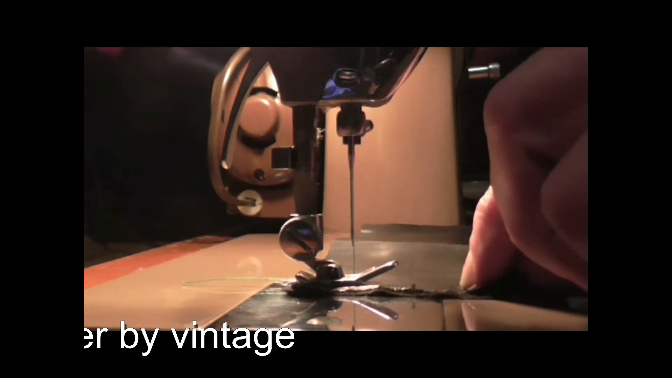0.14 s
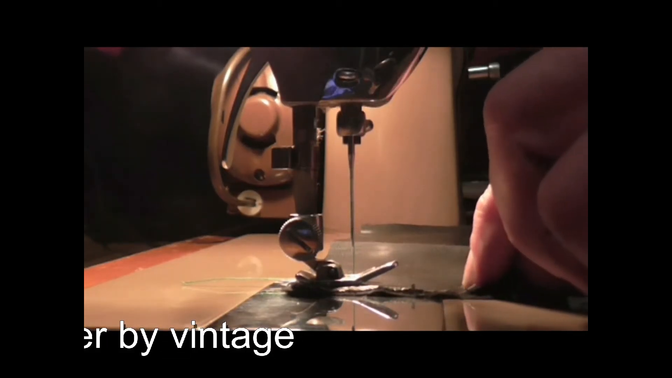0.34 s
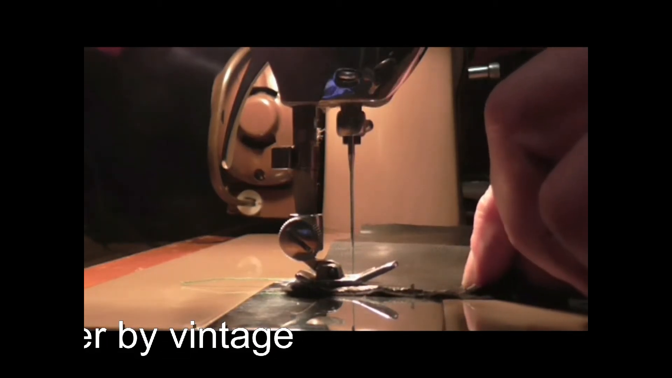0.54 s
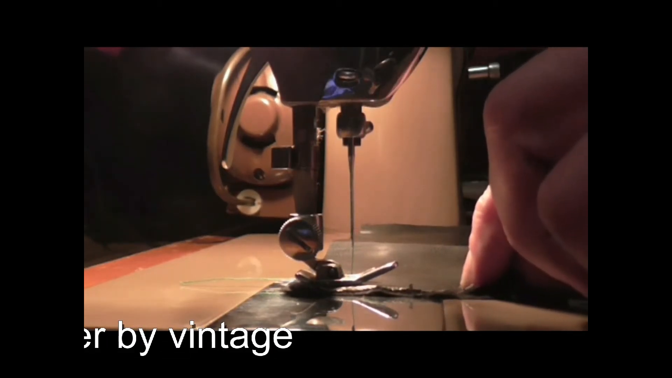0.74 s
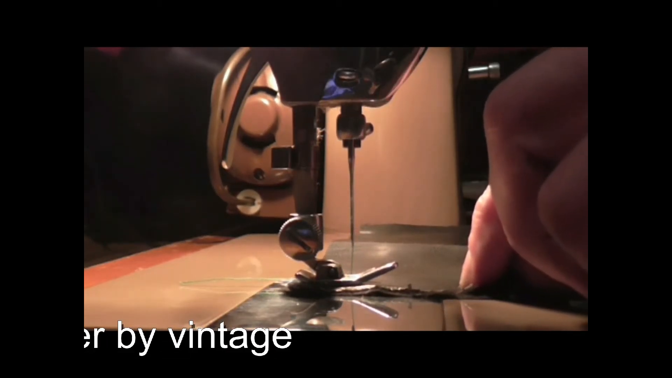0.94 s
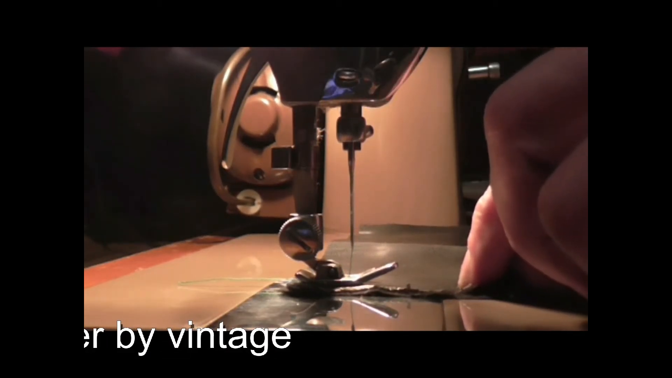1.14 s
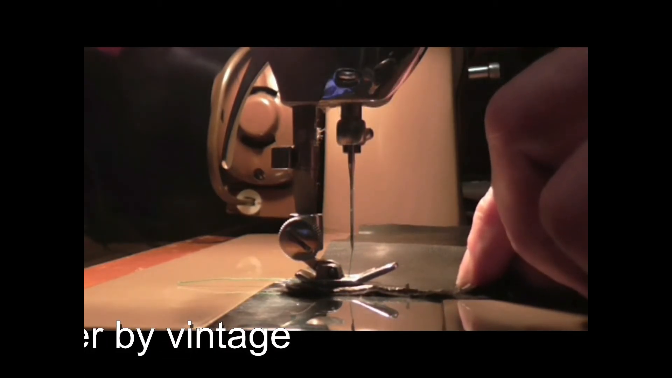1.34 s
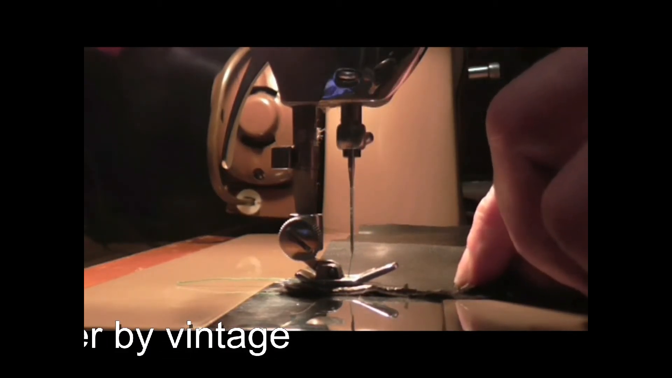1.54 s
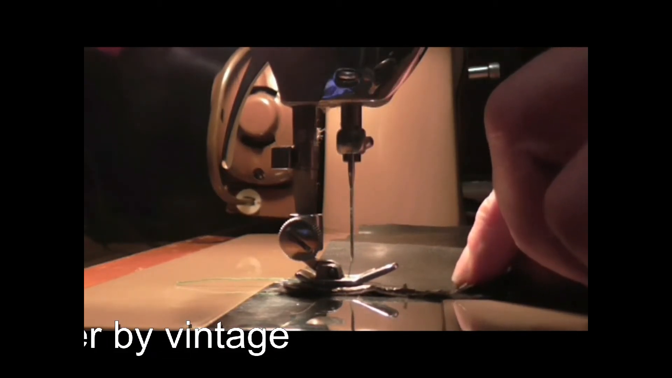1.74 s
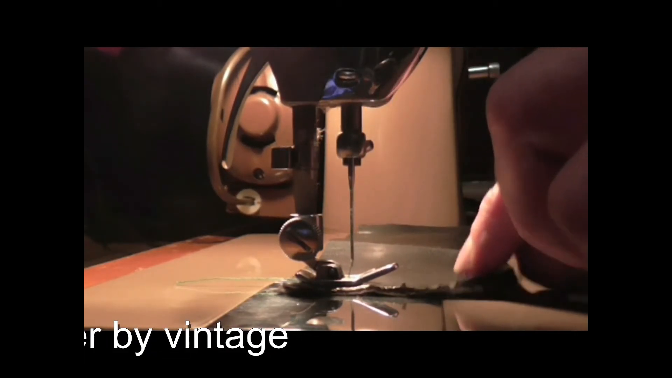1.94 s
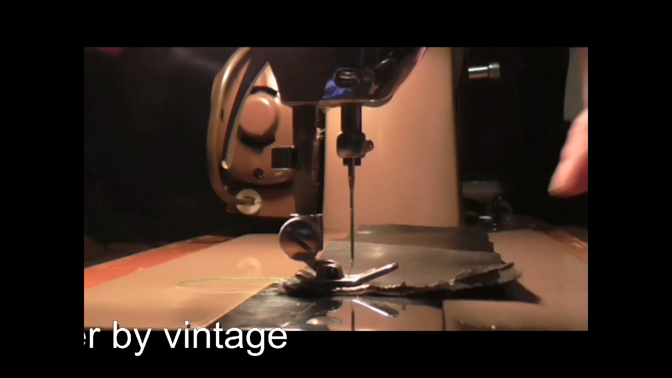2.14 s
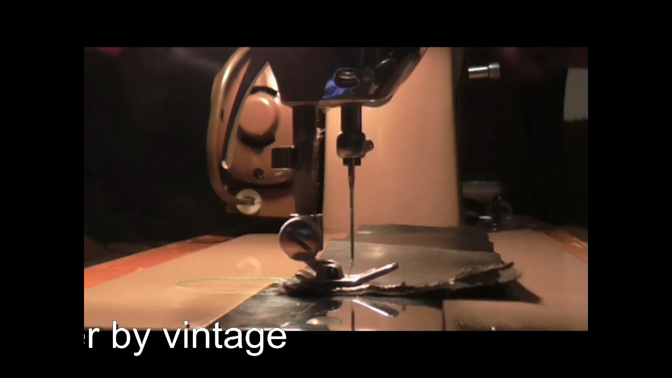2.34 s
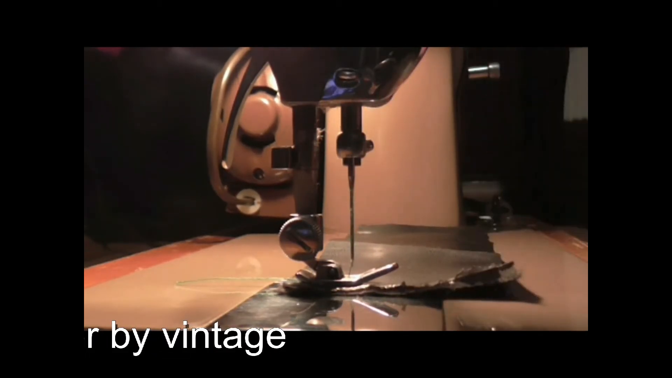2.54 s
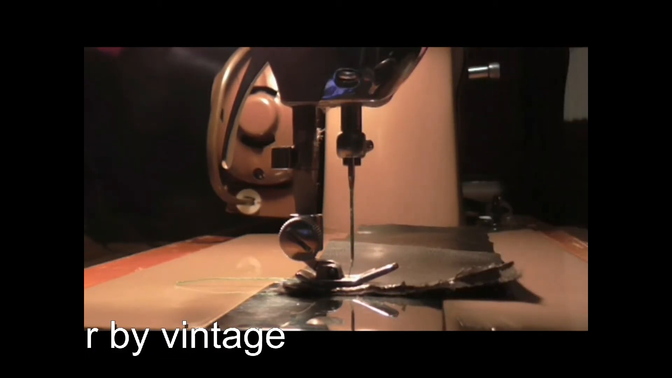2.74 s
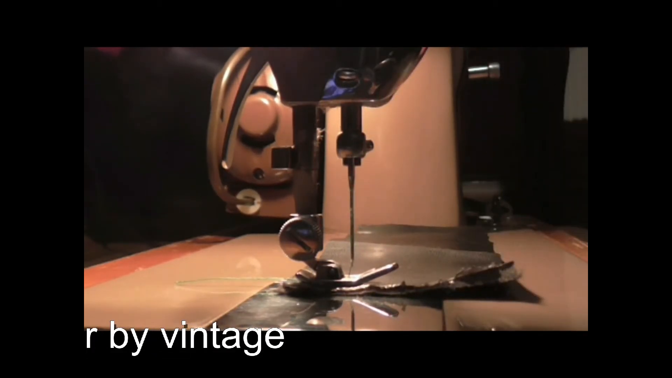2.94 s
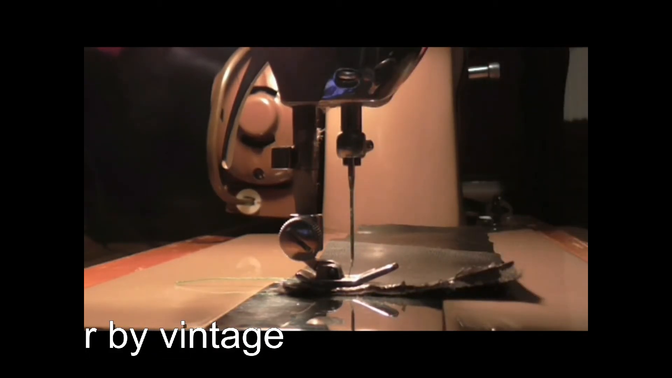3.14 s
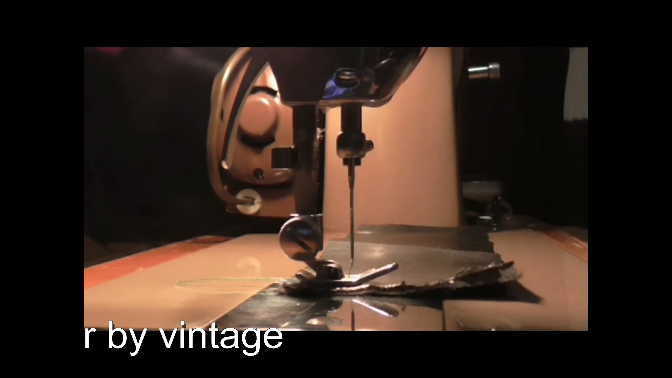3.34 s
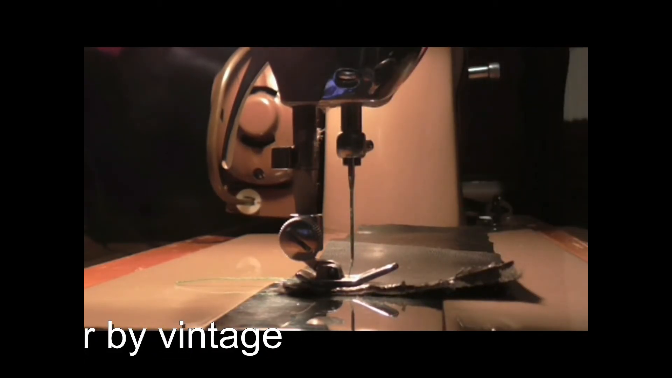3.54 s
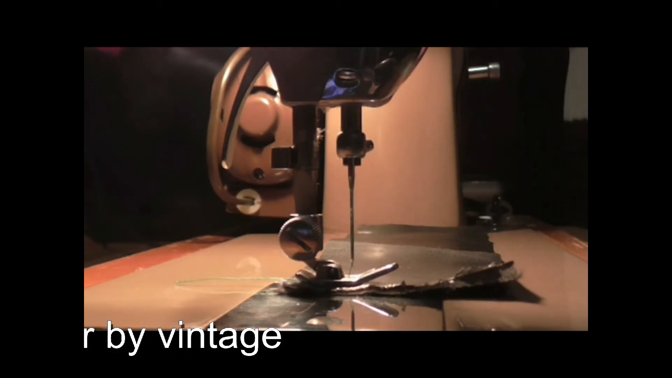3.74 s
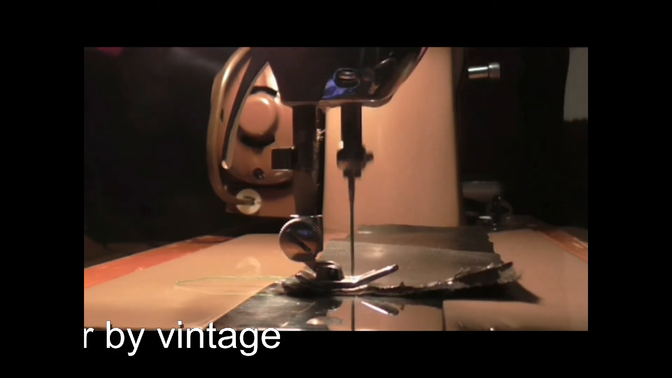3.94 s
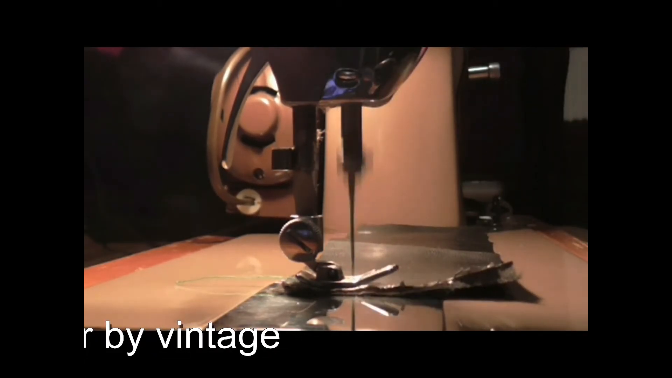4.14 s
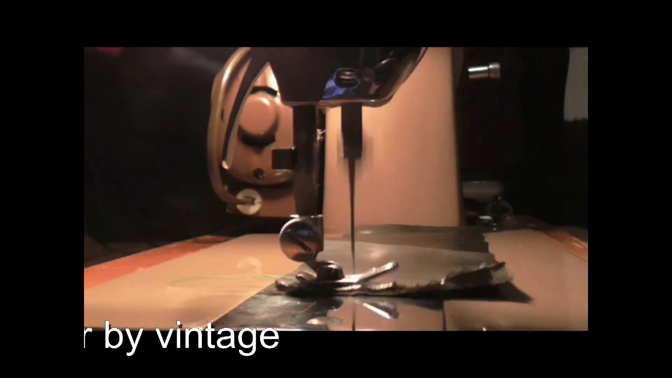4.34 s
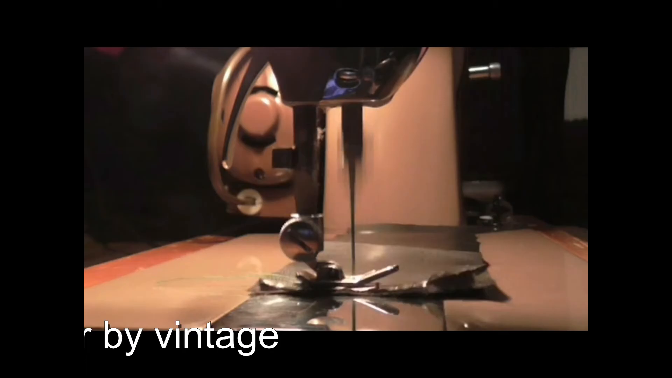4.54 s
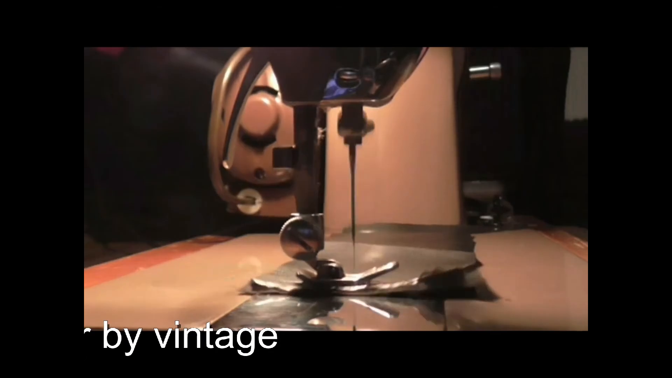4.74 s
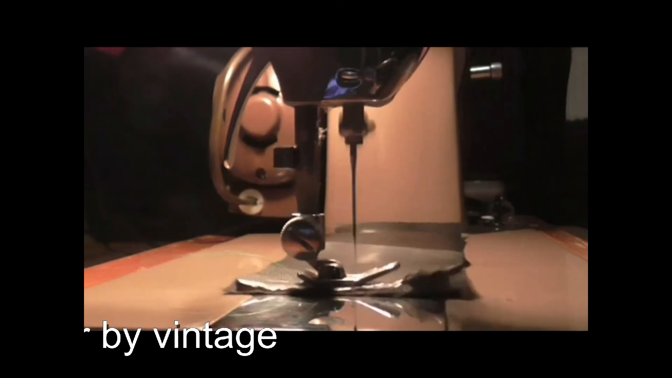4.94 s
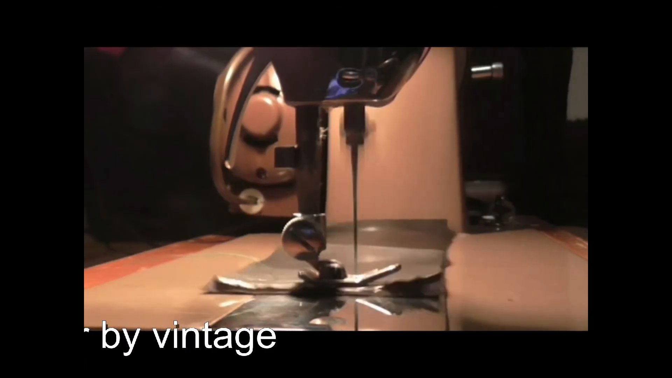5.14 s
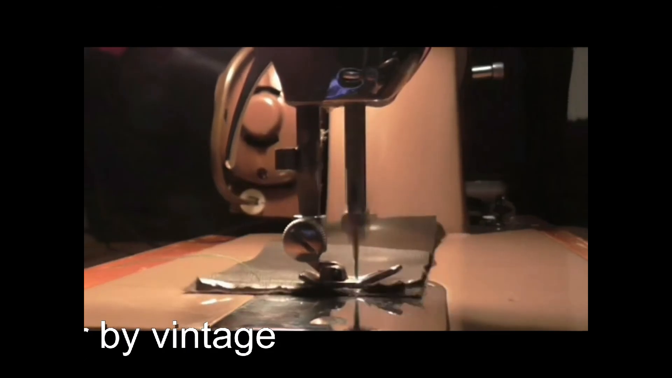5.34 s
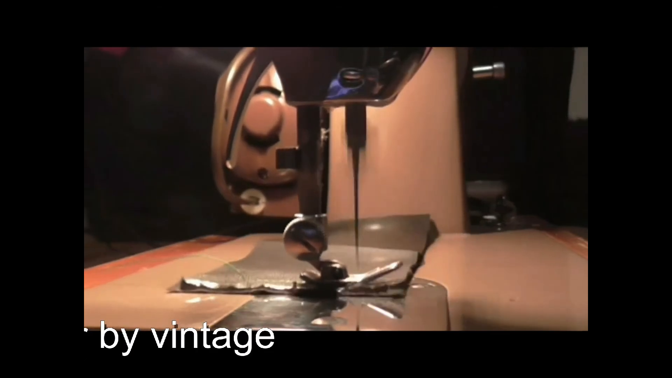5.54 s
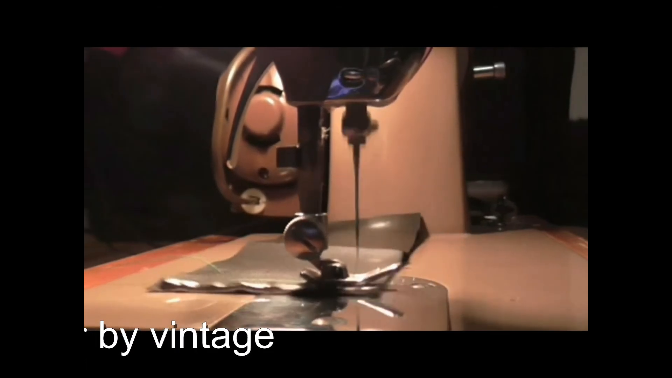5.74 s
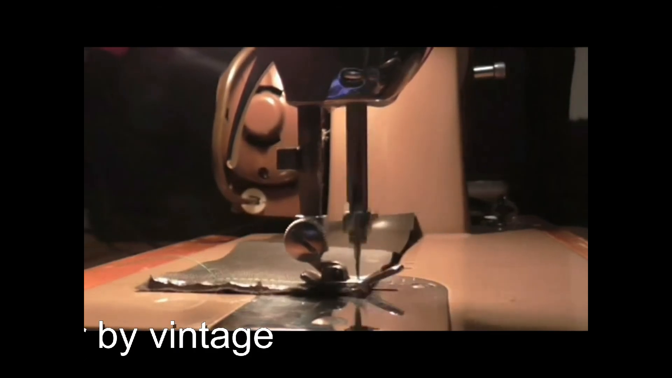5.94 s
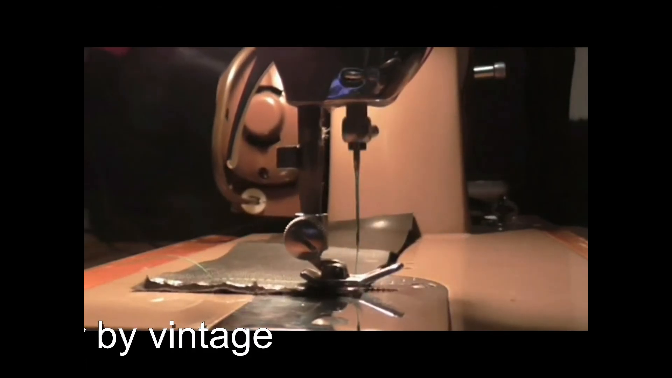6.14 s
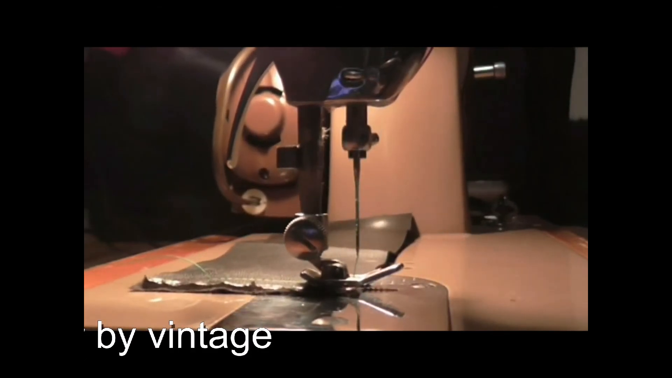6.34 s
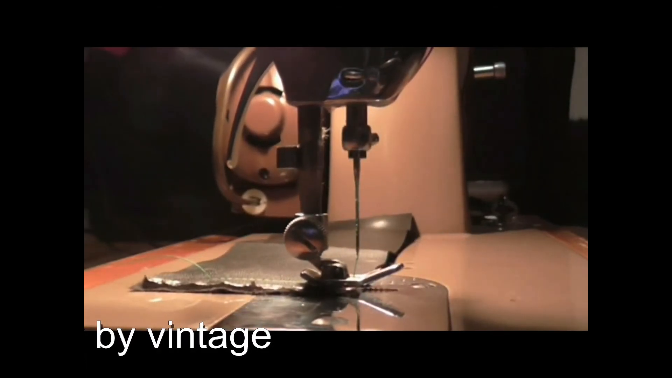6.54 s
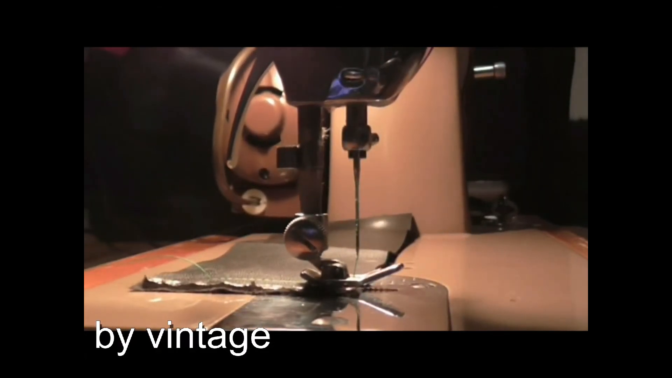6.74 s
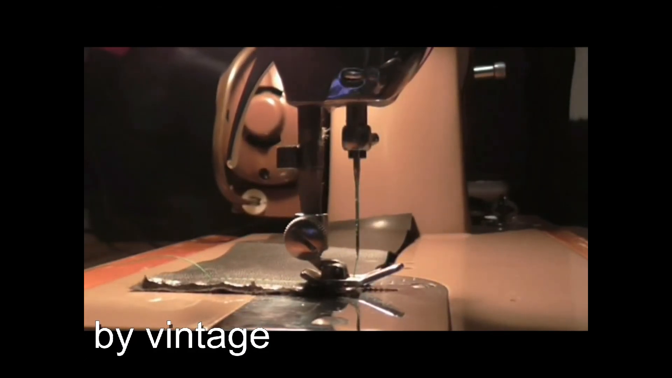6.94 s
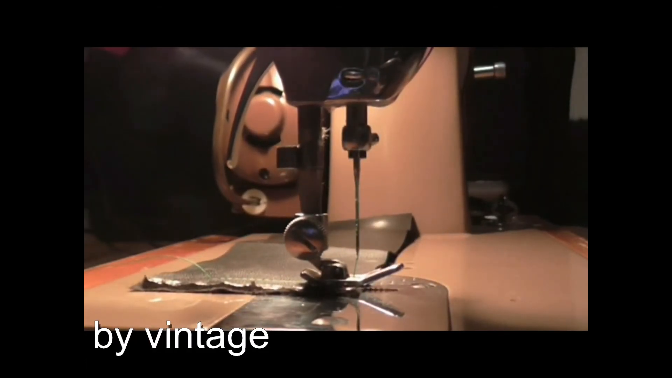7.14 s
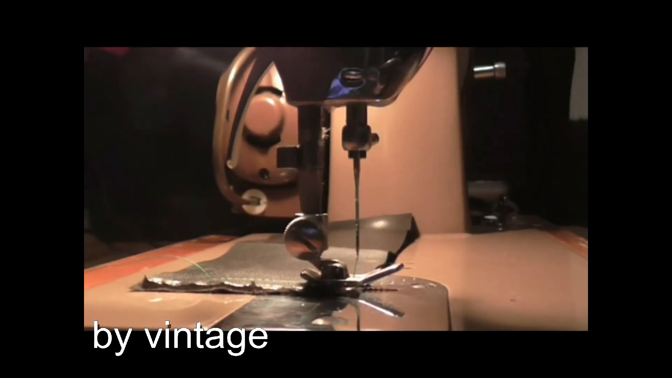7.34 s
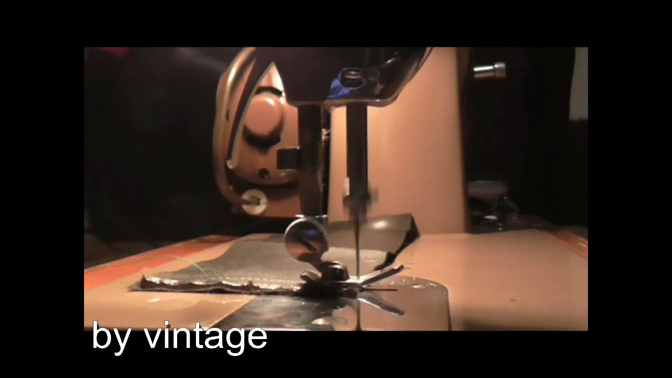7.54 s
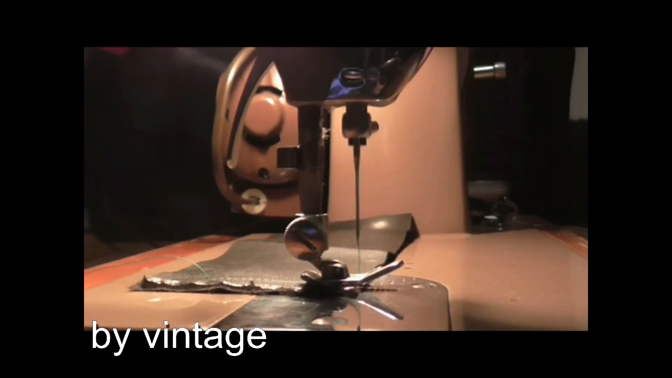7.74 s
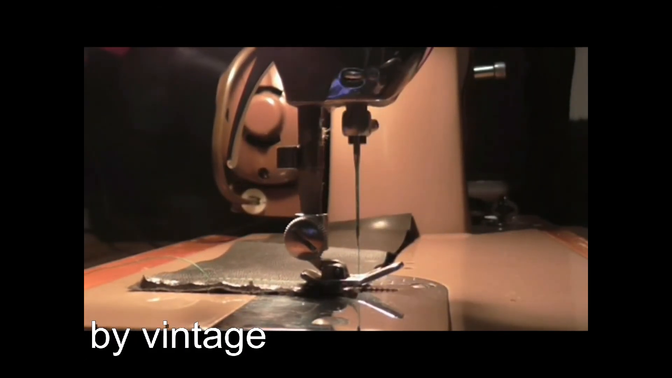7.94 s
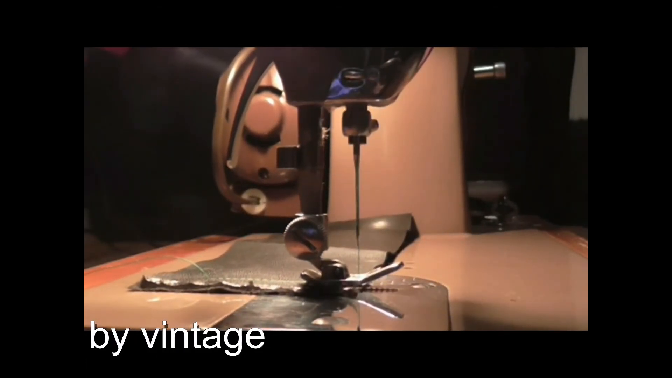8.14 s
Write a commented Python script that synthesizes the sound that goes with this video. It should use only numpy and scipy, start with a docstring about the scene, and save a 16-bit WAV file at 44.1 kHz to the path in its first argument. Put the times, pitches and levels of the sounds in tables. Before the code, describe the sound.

Beside the needle of an electric sewing machine in a quiet, faintly humming room. A hand nudges the wheel with soft rubbing, a small squeak, ticks and taps; cloth slides. The pedal snaps, and the motor drives a loud metallic clatter of stitches for two seconds, speeding up, then slowing. After a pause come more pedal snaps, one very short burst with hollow knocks, and a last snap.

```python
"""An electric sewing machine heard from beside the needle in a quiet room with hum and a faint whine.
A hand nudges the handwheel: parts rub, gears sing, small parts squeak, tick and tap; then cloth slides.
The pedal snaps and the motor drives a run of stitches, later one short burst; a last snap follows.
Knocks of cranks and feed ring modes of the cast frame, the hook ticks; shafts and gears rub as noise."""
import sys
import numpy as np
from scipy import signal
from scipy.fft import rfft, irfft, next_fast_len
from scipy.io import wavfile
from scipy.ndimage import uniform_filter1d

SR = 44100
rng = np.random.default_rng(int(sys.argv[2]) if len(sys.argv) > 2 else 0)


def inscribe(sig):
    """Save sig as 16-bit PCM at rate SR to the path in sys.argv[1].

    A 1-D sig is mono; a 2-D sig holds one channel per row.
    Samples are clipped to [-1, 1] before scaling.
    """
    pcm = np.round(np.clip(np.atleast_2d(sig).T, -1, 1) * 32767)
    wavfile.write(sys.argv[1], SR, pcm.astype(np.int16))


def volts(x):
    """Linear amplitude factor 10**(x/20) for a level x in dB, scalar or array-like."""
    e = np.asarray(x, float) / 20
    return 10 ** e


N = 364707

# modes of cast frame and needle plate: pitch_hz, relative_db, base_t60_s
FRAME = [(180.6, -15, 0.15), (376, -1, 0.044), (418.3, 6, 0.027), (461.2, -1, 0.067), (577, 7, 0.018),
         (648, -3.5, 0.083), (777, -4.5, 0.076), (890, -42, 0.023), (1117, -4.5, 0.16), (1133, -10, 0.16),
         (1155, 6.5, 0.021), (1415, 8.5, 0.0073), (1704, 1, 0.023), (1987, 13.5, 0.0034),
         (2048, -11, 0.027)]
# colour of hiss and small parts: freq_hz, density_db_per_hz
HISS_COLOUR = [(1800, -66), (2700, -4.5), (3400, -0.5), (4400, 8), (5800, 0.5), (7000, -2.5), (8100, -0.5),
               (9300, -9.5), (13000, -11.5), (15000, -33), (16000, -67)]
# main shaft angle, [run, burst]: time_s, stitches_sewn
SHAFT_ANGLE = [
    [(3.96, -.16), (4.0, 0), (4.081, .34), (4.172, .67), (4.198, .83), (4.248, 1), (4.317, 1.34),
     (4.429, 2), (4.565, 3), (4.687, 4), (4.799, 5), (5.002, 7), (5.187, 9), (5.441, 12), (5.609, 14),
     (5.789, 16), (5.868, 16.67), (5.914, 17), (5.968, 17.34), (6.03, 17.67), (6.061, 17.83), (6.124, 18),
     (6.2246, 18.4)],
    [(7.52, .85), (7.558, 1), (7.576, 1.13), (7.622, 1.35), (7.687, 1.67), (7.713, 1.83), (7.742, 2),
     (7.815, 2.4)],
]
# motor-driven shafts, [run, burst]: time_s, rumble_db, rubbing_hiss_db
TURNING = [
    [(3.9, -58, -71), (3.95, -33.5, -50.5), (4.1, -31, -45), (4.17, -25, -36.5), (4.3, -26.5, -30.5),
     (4.9, -27.5, -28), (5.65, -29.5, -29), (5.8, -28, -31.5), (5.97, -31.5, -35.5), (6.12, -34.5, -43),
     (6.3, -62, -69)],
    [(7.38, -59, -72), (7.47, -47, -58), (7.52, -32, -48), (7.6, -32, -42.5), (7.68, -25, -36),
     (7.77, -35, -40.5), (7.79, -42, -43.5), (7.84, -44, -42.5), (7.93, -80, -101)],
]
PLATE_LOW_HZ, PLATE_HIGH_HZ = 1050, 1250


def rms_one(x):
    """Scales to rms 1."""
    return x / np.sqrt(np.mean(x ** 2) + 1e-20)


def at_hz(points, hz):
    """Reads a (Hz, dB) curve on a log frequency axis."""
    points_hz, points_db = np.array(points)[:, 0], np.array(points)[:, 1]
    return np.interp(np.log(hz + 1), np.log(points_hz), points_db)


def coloured(x, points):
    """Shapes a steady sound by a (Hz, dB) curve."""
    size = next_fast_len(N)
    bins_hz = np.arange(size // 2 + 1) * SR / size
    return irfft(rfft(x, size) * volts(at_hz(points, bins_hz)), size)[..., :N]


def drift(rate_hz):
    """Slow random wander of rms 1: low-passed noise on 60 knots a second."""
    knots = rng.standard_normal(int(N / SR * 60) + 2)
    pole = np.exp(-2 * np.pi * rate_hz / 60)
    wander = rms_one(signal.lfilter([1], [1, -pole], knots))
    return np.interp(np.arange(N) / SR * 60, np.arange(len(knots)), wander)


def ring(push, hz, t60_s):
    """Two-pole resonator: a unit click sets a dying sine of height 1 ringing."""
    r, w = volts(-60 / (t60_s * SR)), 2 * np.pi * hz / SR
    return signal.lfilter([0, np.sin(w)], [1, -2 * r * np.cos(w), r * r], push + 1e-18)


def contact(times_s, gains, hz, grit, chatter_s, rough):
    """A blow feeds a mode over milliseconds: partly in step with it, partly as chatter of the parts."""
    at = np.round(np.array(times_s) * SR).astype(int)
    n, span = np.arange(grit.shape[1]), chatter_s * SR
    swell = 2 * n / span * np.exp(-n / span) / np.sqrt(span)
    in_step = np.cos(2 * np.pi * hz * n / SR) / np.sqrt(span)
    push = np.zeros(N + len(n))
    np.add.at(push, at[:, None] + n, gains[:, None] * swell * (in_step + rough * grit))
    return push[:N]


def strike(times_s, level_db, modes, chatter_s, rough, scatter_db):
    """Rings all modes; level_db(hz) gives the strength of each blow, scattered anew for each mode."""
    chance = rng.standard_normal((len(times_s), 2 * len(modes)))
    grit = rng.standard_normal((len(times_s), 900))
    out = np.zeros(N)
    for k, (hz, db, t60_s) in enumerate(modes):
        gains = volts(level_db(hz) + db + scatter_db * chance[:, 2 * k])
        if not PLATE_LOW_HZ < hz < PLATE_HIGH_HZ:  # the plate always swings the same way first
            gains = gains * np.sign(chance[:, 2 * k + 1])
        mode_grit = np.roll(grit, 37 * k, axis=1)
        out += ring(contact(times_s, gains, hz, mode_grit, chatter_s, rough), hz, t60_s)
    return out


def local_hits(rows, modes, octaves, gain_db, chatter_s, rough):
    """A small hit wakes mostly the modes near its own pitch."""
    s, hit_db, centre_hz = np.transpose(rows)
    even = [(hz, db * 0.79, t60_s) for hz, db, t60_s in modes]

    def level_db(hz):
        return hit_db + gain_db - np.minimum(6 * (np.log2(hz / centre_hz) / octaves) ** 2, 30.0)

    return strike(s, level_db, even, chatter_s, rough, scatter_db=0.5)


def crowd(spectrum, low_hz, high_hz, cycles, count):
    """Many close, unrelated modes under one colour, each with a t60 of a number of cycles."""
    pitches_hz = np.geomspace(low_hz, high_hz, count) * (1 + 0.034 * rng.standard_normal(count))
    return [(hz, at_hz(spectrum, hz) + 10 * np.log10(hz / low_hz), cycles / hz)
            for hz in np.minimum(pitches_hz, .45 * SR)]


def echoes(x, t60_s, after_s):
    """Dense reflections dying away, dulled by the walls, of total energy 1."""
    wall_cut_hz = 9400
    t = np.arange(int(.6 * SR)) / SR
    tail = rng.standard_normal(len(t)) * volts(-60 * t / t60_s) * (t > after_s)
    tail = signal.lfilter([1], [1, -np.exp(-2 * np.pi * wall_cut_hz / SR)], tail)
    return signal.fftconvolve(x, tail / np.sqrt(np.sum(tail ** 2)))[:N]


def air():
    """Room air noise, a wavering mains hum and a faint high whine; as sum and difference."""
    # room air: freq_hz, density_db_per_hz
    air_colour = [(15, -68.5), (25, -30), (70, -11.5), (195, -8.5), (354, -7), (560, -8), (754, -14),
                  (1370, -17.5), (2690, -23), (7920, -27.5), (12900, -36), (16000, -58)]
    # difference against sum: freq_hz, gain_db
    air_sideways = [(60, 4), (240, -1.5), (950, 2), (3770, -3), (15000, -1)]
    hum_hz, whine_hz = 100, 7860
    t = np.arange(N) / SR
    mid, side = volts(-62.5) * rms_one(coloured(rng.standard_normal((2, N)), air_colour))
    hum = volts(-67.5 + 0.5 * drift(2.9)) * np.sin(2 * np.pi * hum_hz * t + 0.11 * drift(1.46))
    whine = volts(-82.5) * rms_one(ring(rng.standard_normal(N), whine_hz, 0.11))
    return mid + hum + whine, coloured(side, air_sideways) + 0.096 * hum + 0.72 * whine


def rubbing(load):
    """Bearings and gears rub: dense grit rings the frame and adds hiss, by hand and by motor."""
    clicks = rng.random(N) < 3000 / SR
    sizes = volts(2.83 * np.minimum(rng.exponential(1, N), 4.0))
    grit = clicks * sizes * rng.choice([-1, 1], N)
    rings = np.array([volts(db) * ring(grit, hz, t60_s * 1.13) for hz, db, t60_s in FRAME])
    rings /= np.std(rings.sum(axis=0))
    hiss = rms_one(coloured(rms_one(grit) * .5 + rng.standard_normal(N), HISS_COLOUR))
    return hand_pushes(grit, rings, hiss) + driven_shafts(rings, hiss, load)


def hand_pushes(grit, rings, hiss):
    """Uneven pushes on wheel and cloth stir frame modes near one pitch, gear song and a duller hiss."""
    # pushes: start_s, end_s, rumble_db, rubbing_hiss_db, most_stirred_hz
    pushes = [(-.05, 0.15, -56.5, -60.5, 874), (0.263, 0.46, -55.5, -60.5, 616),
              (0.533, 0.745, -46.5, -55.5, 520), (0.813, 1.015, -57, -61, 1160),
              (1.05, 1.35, -59, -60.5, 1500), (1.34, 1.648, -61, -63, 890),
              (1.677, 1.917, -56.5, -60.5, 850)]
    gears_hz, gears_db = 2007, -12
    t = np.arange(N) / SR
    frame_hz = np.array(FRAME)[:, 0]
    dull = rms_one(2.6 * hiss + rms_one(ring(hiss, 5240, 0.005)))
    gears = rms_one(ring(grit, gears_hz, t60_s=0.033))
    pushed = np.zeros(N)
    for start_s, end_s, rumble_db, hiss_db, centre_hz in pushes:
        span = slice(max(int(start_s * SR), 0), int(end_s * SR))
        stirred = volts(-4.0 * np.log2(frame_hz / centre_hz) ** 2) @ rings[:, span]
        stirred = stirred + volts(gears_db) * gears[span]
        rise = (t[span] - start_s) / 0.025
        fall = (end_s - t[span]) / (0.27 * (end_s - start_s))
        stroke = np.clip(np.minimum(rise, fall), 0, 1)
        pushed[span] += stroke * (volts(rumble_db) * stirred + volts(hiss_db) * dull[span])
    return volts(2.2 * drift(25)) * pushed


def driven_shafts(rings, hiss, load):
    """Motor-driven shafts: frame rings over broad rumble and hiss, both loaded by each knock."""
    # broad rumble: freq_hz, density_db_per_hz
    rumble_colour = [(20, -13), (60, 6.5), (100, -49), (270, -22.5), (420, 3.5), (780, 2.5), (900, -9),
                     (1110, 4), (1300, -6.5), (1730, 1), (2100, 1.5), (2400, -20.5), (3200, -61)]
    plate_held_db = -13  # cloth mutes the plate's ring between blows
    growl_hz, dulls_when_slow = 900, 0.243  # above growl_hz rumble follows hiss by this share
    heaviest_share, rumble_swell_db = 0.22, 1.5  # bearing load swells once a stitch in the run
    rumble_shudder, hiss_shudder = 0.99, 0.31  # added share per unit load
    t, driven = np.arange(N) / SR, np.zeros((2, N))
    for part in TURNING:
        s, *levels_db = np.transpose(part)
        driven += [volts(np.interp(t, s, db, -200, -200)) for db in levels_db]
    held = [volts(plate_held_db) if PLATE_LOW_HZ < hz < PLATE_HIGH_HZ else 1 for hz, _, _ in FRAME]
    broad = rms_one(coloured(rng.standard_normal(N), rumble_colour))
    rumble = rms_one(held @ rings + volts(2.0) * broad)
    growl = signal.sosfilt(signal.butter(1, growl_hz, fs=SR, output="sos"), rumble)
    hiss_to_rumble = (driven[1] + 1e-12) / (driven[0] + 1e-12)
    rumble = growl + (rumble - growl) * hiss_to_rumble ** dulls_when_slow
    s, sewn = np.transpose(SHAFT_ANGLE[0])
    swell = np.cos(2 * np.pi * (np.interp(t, s, sewn) - heaviest_share)) * (t > s[0]) * (t < s[-1])
    rumble = driven[0] * volts(rumble_swell_db * swell) * (1 + rumble_shudder * load) * rumble
    return rumble + volts(2.0 * drift(47)) * (1 + hiss_shudder * load) * driven[1] * hiss


def squeaks():
    """A dry bearing or a rubbing edge sings faintly: noise through a narrow resonator."""
    # squeaks: start_s, length_s, level_db, pitch_hz
    squeak_rows = [(0.275, 0.1, -50, 644), (1.578, 0.045, -65, 4930), (2.105, 0.068, -65, 4990),
                   (7.37, 0.1, -53, 1574)]
    t, out = np.arange(N) / SR, np.zeros(N)
    for start_s, length_s, db, hz in squeak_rows:
        arch = np.sin(np.pi * np.clip((t - start_s) / length_s, 0, 1))
        out += volts(db) * arch * rms_one(ring(rng.standard_normal(N), hz, t60_s=0.095))
    return out


def bumps_and_hollow_knocks():
    """Bumps on table and casing, and two hollow knocks of the machine late in the burst: short modes, echoed."""
    # bumps and hollow knocks: start_s, relative_db, centre_hz
    bump_rows = [(.506, -35.5, 1560), (.581, -28.5, 1860), (.614, -26, 1850), (1.165, -34.5, 725),
                 (1.888, -40.5, 220), (3.007, -30.5, 580), (3.772, -29.5, 1820), (3.901, -37.5, 1500),
                 (3.923, -29, 2050), (7.428, -32.5, 1620), (7.742, -7.5, 900), (7.764, -16.5, 900)]
    # colour of the modes: freq_hz, density_db_per_hz
    body_colour = [(150, -4), (500, -10.5), (1000, -11), (2000, -4), (2600, -32)]
    modes = crowd(body_colour, 187.5, 2175, cycles=41.6, count=22)
    thuds = local_hits(bump_rows, modes, 0.94, -9, 0.0005, rough=0.6)
    return thuds + volts(-7.5) * echoes(thuds, 0.29, 0.0023)


def loose_ticks(stitch_ticks, small_parts):
    """Thread guides, slack parts and stitch contacts tick in the small parts and top frame modes."""
    # loose ticks: start_s, relative_db, centre_hz
    tick_rows = [(0.614, -14.5, 4500), (1.1618, -26, 5000), (3.7763, -26.5, 3280), (3.9095, -28, 3790),
                 (3.9216, -17.5, 4200), (4.0228, -6, 4600), (4.0991, -10, 5600), (4.376, -6.5, 7350),
                 (7.108, -38, 3150), (7.4794, -18, 4400), (7.4891, -18.5, 4300)]
    return local_hits(tick_rows + stitch_ticks, FRAME[-3:] + small_parts, 0.47, -5.0, 0.0016, rough=0.33)


def taps(small_parts):
    """Light taps on the needle plate while handling."""
    # taps: start_s, relative_db
    tap_rows = [(.945, -39.5), (1.164, -23), (1.235, -39), (1.258, -39.5), (1.303, -35), (1.366, -33.5),
                (1.423, -38.5), (1.502, -34.5)]
    centre_hz = 1060
    rows = [(s, db, centre_hz) for s, db in tap_rows]
    return local_hits(rows, FRAME + small_parts[:8], 0.84, -8, 0.0023, rough=0.18)


def cloth():
    """Cloth slides over the bed: a broad rustle that swells fast and fades."""
    # slide: start_s, end_s, level_db
    slide = (2.735, 3.43, -60.5)
    # rustle: freq_hz, density_db_per_hz
    rustle_colour = [(880, -22), (1500, -4), (2910, -14), (3820, -2.5), (6630, -8.5), (10700, -15),
                     (14000, -30)]
    t = np.arange(N) / SR
    start_s, end_s, db = slide
    stroke = np.clip(np.minimum((t - start_s) / 0.086, (end_s - t) / 0.55), 0, 1)
    return stroke * volts(db + 1.5 * drift(14)) * rms_one(coloured(rng.standard_normal(N), rustle_colour))


def pedal():
    """The switch snaps and bounces in a hollow plastic pedal; farther off, so duller and more echoed."""
    # snaps: start_s, snap_db, first_touch_re_snap_db
    snaps = [(3.612, -19.5, -10.5), (7.183, -17.5, -10), (7.2, -20, -1.5), (8.1299, -15.5, -0.5)]
    # bounces: delay_s, re_snap_db
    bounces = [(.0045, 4.5), (.009, 0), (.02, -7)]
    # hollow body: freq_hz, density_db_per_hz
    body_colour = [(150, -47), (250, -33), (464, -34), (650, -2), (1000, -9), (1300, -7), (1620, -8),
                   (1950, 4.5), (2300, -32.5), (5310, -9), (9100, -34), (11000, -62)]
    # blade and its seat: pitch_hz, relative_db, t60_s
    blade = [(1648, 9, 0.006), (693, 0, 0.014)]
    hits = [(s + late_s, db + offset_db)
            for s, db, first_db in snaps for late_s, offset_db in [(0.00047, first_db)] + bounces]
    s, hit_db = np.transpose(hits)
    shell = crowd(body_colour, 396, 8520, cycles=9.0, count=60) + blade
    snap = strike(s, lambda hz: hit_db - 13, shell, 0.0012, rough=0.5, scatter_db=2.5)
    snap = signal.sosfilt(signal.butter(2, [350, 8000], "band", fs=SR, output="sos"), snap)
    return snap + volts(-5.0) * echoes(snap, 0.26, 0.0024)


def motor():
    """In the run the rotor hums once a turn, harder when faster; brushes whine once a bar via the frame."""
    turns_per_stitch, commutator_bars = 13.8, 13
    t = np.arange(N) / SR
    s, sewn = np.transpose(SHAFT_ANGLE[0])
    stitches_per_s = np.interp(t, (s[1:] + s[:-1]) / 2, np.diff(sewn) / np.diff(s))
    turns_hz = uniform_filter1d(turns_per_stitch * stitches_per_s, size=SR // 4)
    angle = 2 * np.pi * np.cumsum(turns_hz * (1 + 0.0033 * drift(20.5))) / SR
    whine = sum(ring(np.sin(commutator_bars * angle), hz, t60_s=0.031) for hz, _, _ in FRAME[-2:])
    hum = volts(-12) * (turns_hz / turns_hz.max()) ** 2 * np.sin(angle)
    s, level_db, _ = np.transpose(TURNING[0])
    return volts(np.interp(t, s, level_db, -200, -200)) * (hum + volts(-20.5) * rms_one(whine))


def jolts(small_parts):
    """Slack is taken up as the motor starts, labours or slows: some dull and deep, some bright or ringing."""
    # jolts: time_s, below_1khz_db, near_1_1khz_db, near_2khz_db
    jolt_rows = [(3.954, -16.5, -55, -34), (3.999, -51, -48, -15.5), (4.023, -19, -49, -41),
                 (4.126, -48, -46, -17), (5.948, -25.5, -38, -40), (6.062, -39, -23, -25),
                 (6.184, -40, -32, -48), (7.445, -39, -54, -28.5), (7.476, -27, -57, -51),
                 (7.572, -18.5, -38, -20), (7.596, -21, -36, -40), (7.72, -24, -15, -10.5)]
    return knocks(np.array(jolt_rows)[:, [0, 1, 1, 2, 3, 3]], small_parts, deep_db=8.5)


def stitching():
    """Every contact of every stitch, as knocks (s, five levels) and ticks (s, dB, Hz)."""
    # needle bar at bottom, thread take-up, feed dog lift, crank reversal, hook letting the loop go:
    # turn_share, to_520hz_db, to_1khz_db, plate_db, near_1_4khz_db, above_db, tick_db, tick_hz
    contact_rows = [(0.0, -26, -27, -18.5, -18, -30, -5, 7360), (.13, -44, -26.5, -42, -53, -32, -11, 5000),
                    (.35, -21.5, -24.5, -33, -39, -20.5, -12, 10300),
                    (.67, -18.5, -24, -24.5, -16.5, -23.5, -12, 8000),
                    (0.831, -27.5, -23, -30, -23, -20, -3, 8600)]
    # how hard the parts meet: time_s, knocks_db, ticks_db, extra_plate_db
    force_rows = [(4.0, -21, -15, 0), (4.1, 5, -10, 6), (4.179, 3, 5.5, 5), (4.55, 1.5, -1, 0),
                  (4.7, 0.5, -2, 2), (5.2, 0, -2, 0), (5.5, 0.5, -2.5, -3), (5.8, -3, -0.5, 7.5),
                  (5.92, 0.5, -4, 3), (5.98, 0, 5.5, 10), (6.04, 0, -2, 1.5), (6.125, 7, 2.5, -9.5),
                  (6.21, -11.5, -20, 14), (7.56, 6, -5, -5.5), (7.69, 1, 9.5, 9), (7.741, 6, -4, -18),
                  (7.811, 1, 7.5, 12.5)]
    presser_share, presser_hz = .21, 1730  # the presser bar rattles once a stitch
    presser_db, presser_db_per_doubling = -11.5, 8  # at 10 stitches/s; growth with speed
    blows, ticks = [], []
    when_s, knock_db, tick_db, plate_db = np.transpose(force_rows)
    for part in SHAFT_ANGLE:
        s, sewn = np.transpose(part)
        for share, low, middle, plate, upper, top, tick, hz in contact_rows:
            turns = np.arange(np.ceil(sewn[0] - share), sewn[-1] - share) + share
            for at in np.interp(turns, sewn, s):
                force = np.interp(at, when_s, knock_db)
                plate_force = force + np.interp(at, when_s, plate_db)
                blows.append((at, low + force, middle + force, plate + plate_force,
                              upper + force, top + force))
                ticks.append((at, tick + np.interp(at, when_s, tick_db), hz))
        turns = np.arange(np.ceil(sewn[0] - presser_share), sewn[-1] - presser_share) + presser_share
        speed = np.interp(turns, sewn, np.gradient(sewn, s))
        rattle_db = presser_db + presser_db_per_doubling * np.log2(speed / 10)
        ticks += [(at, db, presser_hz) for at, db in zip(np.interp(turns, sewn, s), rattle_db)]
    blows = np.array(blows)
    blows[:, 1:] += 1.0 * rng.standard_normal((len(blows), 5))  # dB; no two knocks land alike
    return blows, ticks


def knocks(blows, small_parts, deep_db):
    """Parts hit home in the frame: the high modes swell quickly, the low ones about twice as slowly."""
    # upper edges of the first four mode groups: edge_hz
    group_edges_hz = [520, 1000, 1300, 1550]
    damped_by_load = .55  # share of the ring time left while parts press on the frame
    s, *groups = np.transpose(blows)

    def level_db(hz):
        offset_db = deep_db if hz < 250 else -14 if hz > 2500 else 0
        return groups[np.searchsorted(group_edges_hz, hz)] + offset_db

    heavy = [mode for mode in FRAME if mode[0] < group_edges_hz[0]]
    light = [(hz, db, damped_by_load * t60_s) for hz, db, t60_s in FRAME[len(heavy):]] + small_parts
    return (strike(s, level_db, heavy, chatter_s=0.0043, rough=0.3, scatter_db=1.5)
            + strike(s, level_db, light, chatter_s=0.0022, rough=0.3, scatter_db=1.5))


def shudder(blows):
    """Each knock briefly loads the bearings: a load that dies exponentially."""
    decay_s = 0.016
    s, low_db = np.transpose(blows)[:2]
    kicks = np.zeros(N)
    kicks[(s * SR).astype(int)] = volts(low_db + 18.0)
    return signal.lfilter([1], [1, -np.exp(-1 / (decay_s * SR))], kicks + 1e-18)


def machine(blows, ticks):
    """Everything near the needle with the room behind it, plus bumps and hollow knocks with own echoes."""
    # shuttle hook ping: pitch_hz, relative_db, t60_s
    hook = (8150, -8, .007)
    # bobbin case and thread guides, then the hook
    small_parts = crowd(HISS_COLOUR, 2160, 15020, cycles=10.7, count=15) + [hook]
    near = rubbing(shudder(blows)) + squeaks() + loose_ticks(ticks, small_parts) + taps(small_parts)
    near += cloth() + motor() + jolts(small_parts) + knocks(blows, small_parts, deep_db=-5.0)
    return near + volts(-13.5) * echoes(near, 0.33, 0.0013) + bumps_and_hollow_knocks()


def scene():
    """Machine and pedal as sum and difference, turned to left and right, over the room air."""
    # difference against sum: freq_hz, gain_db
    sideways = [(60, -13), (130, 6.5), (290, -8), (640, -10.5), (1410, -11), (3100, -9), (6820, -8.5),
                (15000, 1)]
    # left over right: freq_hz, gain_db
    leaning = [(200, -1), (700, -1), (1300, 1), (4000, -0.5), (8000, -2.5), (13000, 0.5)]
    microphone_low_cut_hz = 127
    pedal_to_the_right = 0.11  # share taken from the left and given to the right
    contacts = stitching()
    foot = pedal()
    mid = machine(*contacts) + foot
    # the two sides also hear unlike parts of the same body: same blows, other fine grain
    side = coloured(machine(*contacts) + pedal(), sideways) - pedal_to_the_right * foot
    left = coloured(mid + side, [(hz, db / 2) for hz, db in leaning])
    right = coloured(mid - side, [(hz, -db / 2) for hz, db in leaning])
    cut = signal.butter(2, microphone_low_cut_hz, "high", fs=SR, output="sos")
    air_mid, air_side = air()
    room = [volts(2.0) * (air_mid + air_side), volts(4.0) * (air_mid - air_side)]
    return signal.sosfilt(cut, [left, right]) + room


def low_pass(x):
    """Removes everything above the highest recorded frequency."""
    return signal.sosfilt(signal.butter(12, 16000, fs=SR, output="sos"), x)


def record(dry):
    """Delivers the finished stereo mix."""
    return low_pass(dry)


dry = scene()
out = record(dry)
inscribe(out)
```